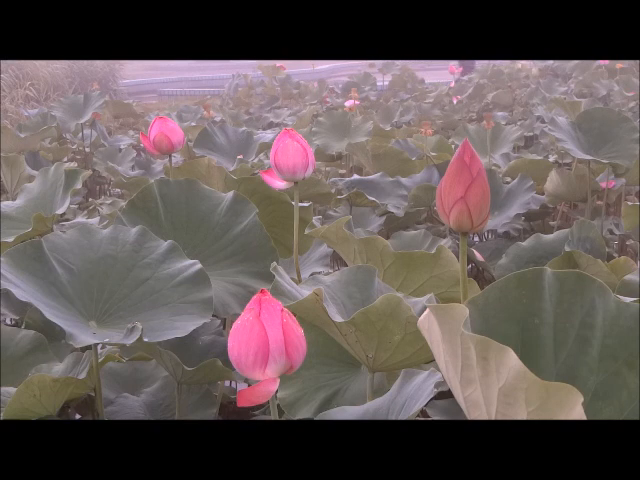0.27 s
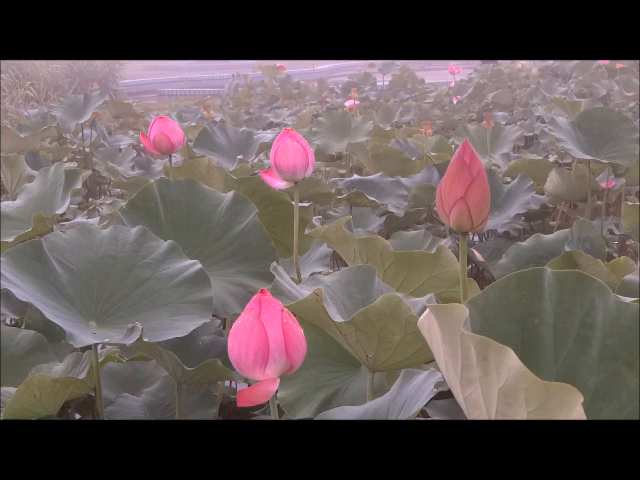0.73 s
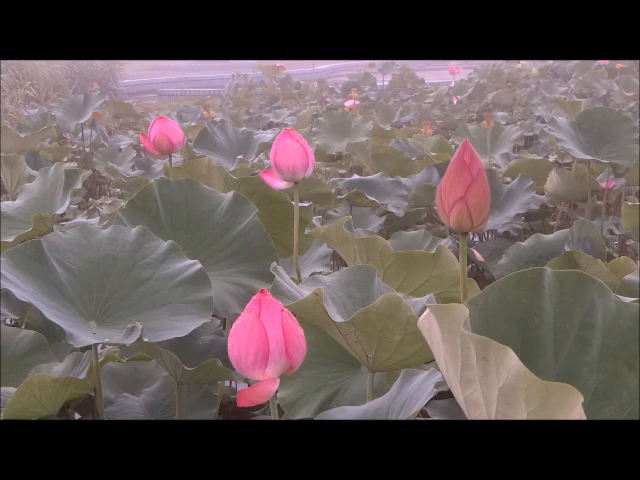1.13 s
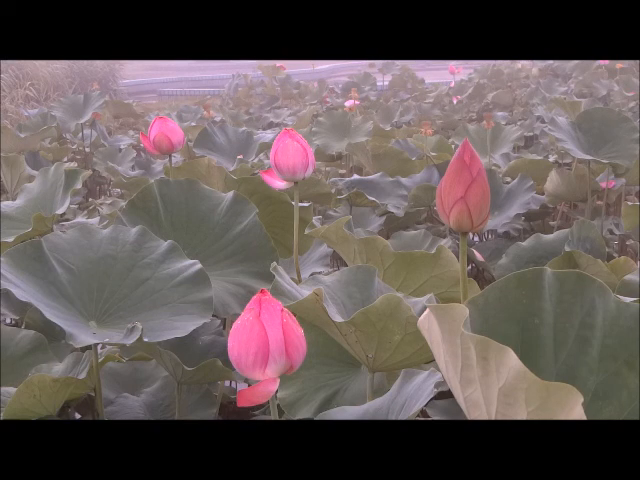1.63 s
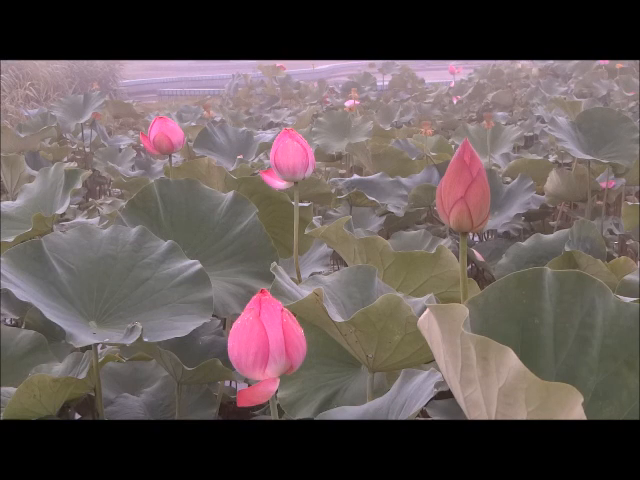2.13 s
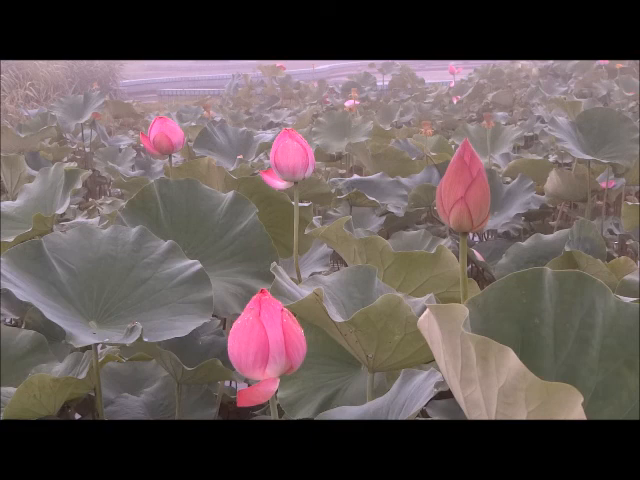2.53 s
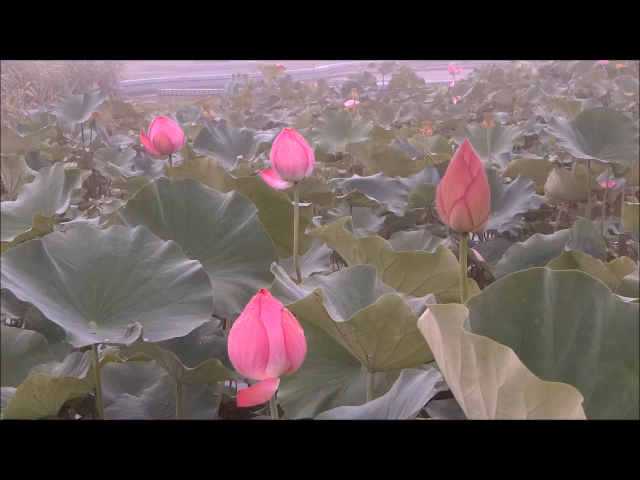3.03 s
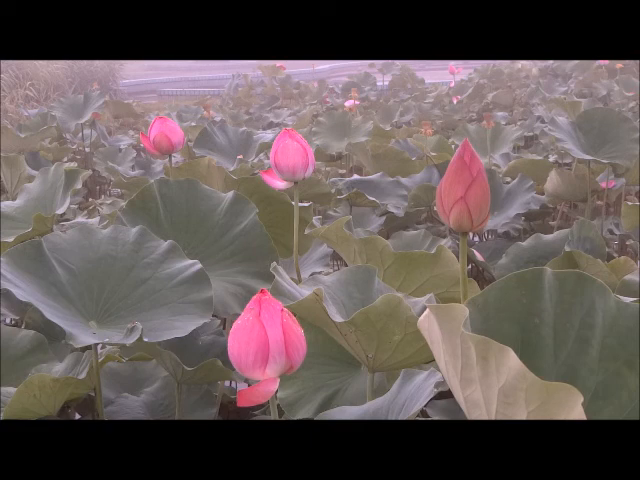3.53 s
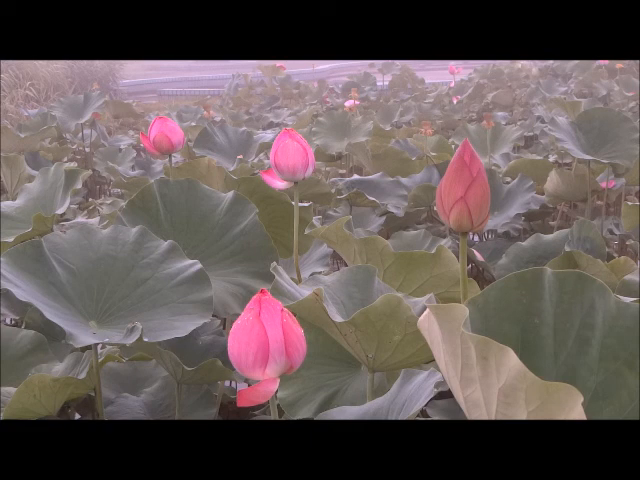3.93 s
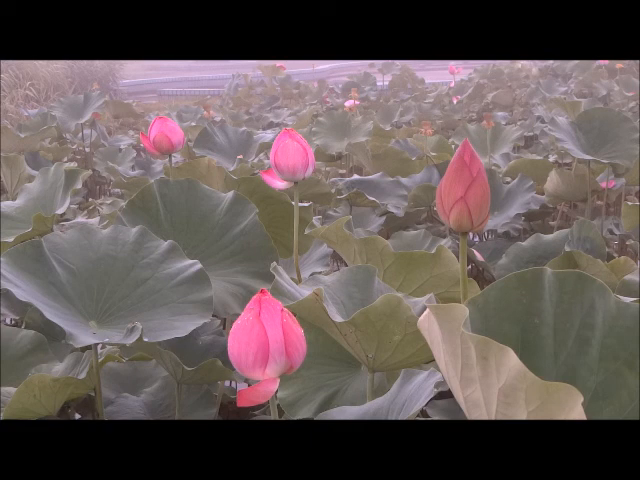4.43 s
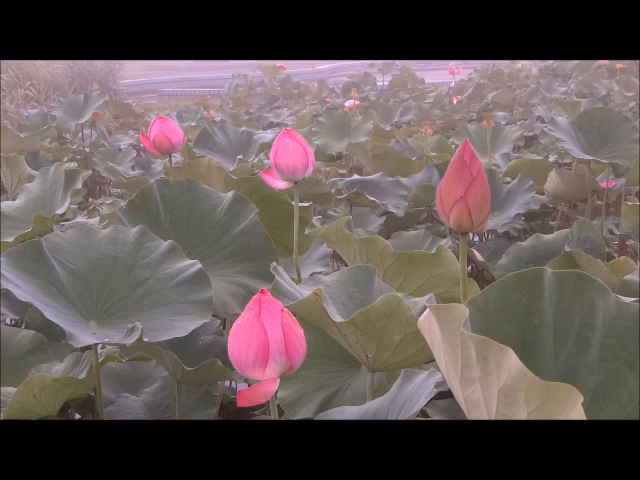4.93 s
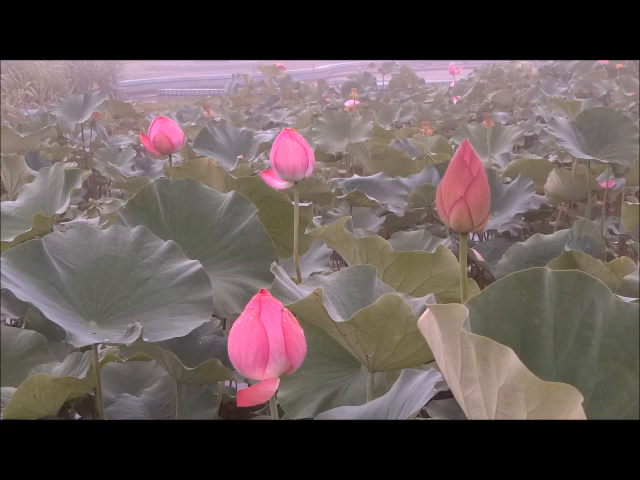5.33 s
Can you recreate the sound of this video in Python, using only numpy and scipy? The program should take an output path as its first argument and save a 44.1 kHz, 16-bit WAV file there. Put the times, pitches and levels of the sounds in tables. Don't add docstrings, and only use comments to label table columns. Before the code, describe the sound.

A dense, steady, very high cicada drone fills a summer lotus pond, with faint low traffic rumble far behind. A reed bird slightly left starts with a rapid rasping run, then gives churrs, faint pairs, rattles, zigzag syllables and, at the end, two buzzes. Tiny far whistles and a few dry ticks near the camera punctuate it. Open air, light echo, stereo camera microphone.

```python
import sys
import numpy as np
from scipy import signal
from scipy.io import wavfile
from scipy.ndimage import uniform_filter1d

SR = 44100
rng = np.random.default_rng(int(sys.argv[2]) if len(sys.argv) > 2 else 0)


def wav_out(sig):
    wavfile.write(sys.argv[1], SR, np.round(np.clip(np.atleast_2d(sig).T, -1, 1) * 32767).astype(np.int16))


def volts_from_decibels(level):
    exponent = np.asarray(level, float) / 20
    return 10 ** exponent


N = 246078


def evened(x):
    return x / np.sqrt(np.mean(x ** 2) + 1e-20)


def read(points, hz):
    f, value = np.transpose(points)
    return np.interp(np.log(hz + 1), np.log(f + 1), value)


def curve(points):
    return np.interp(np.arange(N) / SR, *np.transpose(points))


def add(mix, s, sound):
    part = mix[round(s * SR):][:len(sound)]
    part += sound[:len(part)]


def ring(x, hz, width_hz):
    pole = np.exp((2j * np.pi * hz - np.pi * width_hz) / SR)
    for _ in range(2):
        x = signal.lfilter([1 - abs(pole)], [1, -pole], x)
    return 2 * x.real


# f/Hz, likeness/0-1
LIKENESS = [(96, 1), (230, 0.83), (390, .1), (1400, .09), (2530, 0.31), (4030, 0.53), (6440, .82),
            (10300, 0.69)]
# f/Hz, left minus right/dB
BALANCE = [(100, 0), (290, 1), (450, -0.3), (1000, -.3), (3140, 2), (4660, 0), (6920, -4), (10300, -2)]
# f/Hz, left lead/rad
LEFT_LEAD = [(0, .5), (2500, -0.29), (3960, -0.75), (4480, -.2), (7580, -.2), (9130, -.78), (10200, -.5)]


def wide(colour, patchy_db, flicker_db, size=1024):
    frames, hz = 4 * N // size + 5, np.fft.rfftfreq(size, 1 / SR)
    a, b, c, d, patches = rng.standard_normal((frames, len(hz), 5)).T
    patches = evened(uniform_filter1d(uniform_filter1d(patches, 10, 0), 10, 1))
    flicker = evened(uniform_filter1d(rng.standard_normal(frames), 3))
    same = np.clip(read(LIKENESS, hz), -1, 1)[:, None]
    right, other = a + 1j * b, c + 1j * d
    left = same * right + np.sqrt(1 - same ** 2) * other
    left = left * np.exp(1j * read(LEFT_LEAD, hz))[:, None]
    tilt = volts_from_decibels(read(BALANCE, hz) / 2)[:, None]
    level_db = read(colour, hz)[:, None] + patchy_db * patches + flicker_db * flicker
    z = np.array([left * tilt, right / tilt]) * volts_from_decibels(level_db)
    out = signal.istft(z, nperseg=size, noverlap=3 * size // 4)[1][:, :N]
    return out / np.sqrt(np.mean(out.mean(0) ** 2))


# f/Hz, density/dB per Hz
LOW_CHOIR_COLOUR = [(3180, -40), (5400, -12), (5600, -15), (6060, -1), (6390, -0.5), (6790, -1),
                    (7230, -14.5), (7350, -23.5), (9560, -17), (16200, -120)]
HIGH_CHOIR_COLOUR = [(5000, -54), (7200, -28.5), (7700, -11.5), (8300, -3), (8850, 3.5), (9200, 2.5),
                     (9380, -2), (9500, 0), (9750, -11.5), (10100, -14.5), (10400, -27), (10800, -50.5),
                     (11300, -57.5), (14000, -100)]
# t/s, level/dB
CHOIR_SWELL = [(0, .5), (.8, -.5), (1.3, .5), (3, 0), (5.1, 0.03), (5.58, -0.8)]


def cicada_choirs():
    swell_db = curve(CHOIR_SWELL)
    low = volts_from_decibels(-56 + swell_db) * wide(LOW_CHOIR_COLOUR, patchy_db=0.97, flicker_db=-0.7)
    high = volts_from_decibels(-43.8 + swell_db) * wide(HIGH_CHOIR_COLOUR, patchy_db=0.54, flicker_db=.5)
    return low + high


def near_cicada():
    t = np.arange(N) / SR
    beat_hz, body_hz, width_hz = 121 + .4 * np.sin(2 * np.pi * .3 * t), 9500, 520
    beats = np.cumsum(beat_hz) / SR
    scrape = np.exp(-(beats % 1) / .08) * rng.standard_normal(N)
    body = ring(ring(scrape, body_hz, width_hz), body_hz, width_hz)
    return volts_from_decibels(-54) * evened(body) * volts_from_decibels([[.5], [-.5]])


# f/Hz, density/dB per Hz
CHATTER_COLOUR = [(900, -36), (1700, -8.5), (2400, 0), (3600, -0.5), (4600, -8.5), (6000, -43)]
# t/s, level/dB
CHATTER_SWELL = [(0, -63), (.8, -67.5), (1.3, -71), (1.85, -65), (2.5, -69.5), (3.1, -67.5), (3.8, -70.5),
                 (4.5, -86), (5.1, -79), (5.58, -61.5)]


def far_chatter():
    return volts_from_decibels(curve(CHATTER_SWELL)) * wide(CHATTER_COLOUR, patchy_db=4.5, flicker_db=-1.0, size=512)


# f/Hz, density/dB per Hz
RUMBLE_COLOUR = [(12, -15), (25, -18), (38, -8.5), (52, 1.5), (68, 1), (85, -4.5), (108, -0.5), (122, -.5),
                 (140, -5), (370, -17.5), (650, -17.5), (1200, -21), (4400, -29), (5700, -26.5),
                 (7400, -47), (12000, -110)]


def traffic_rumble():
    return volts_from_decibels(-54.5) * wide(RUMBLE_COLOUR, patchy_db=.5, flicker_db=1.2, size=4096)


# length/s, attack/s, release/s, change over the hold/dB
STROKE_BREATH = dict(chack=(.022, .005, .009, 0), chik=(.017, .005, 0.008, 1),
                 tsek=(0.023, .004, 0.0074, 1.7), scold=(.046, -0.2, .012, -3), tzik=(.038, .007, .014, 1),
                 rasp=(.058, .004, .008, 11.6), mutter=(0.063, .003, .014, 1), churr=(.115, .052, .022, -6),
                 scrape=(.022, .006, .006, 1), buzz=(.062, .006, .008, 2), burr=(.064, .006, .008, -1),
                 trill=(.045, .01, .007, 5), zee=(0.061, .006, 0.013, 8.2), zig=(.031, .007, .008, -5),
                 zag=(0.0538, 0.029, 0.012, 1), rat=(.026, .01, 0.0034, 0), tat=(.018, .004, .004, 3.7),
                 roll=(0.037, .003, 0.0055, 1))
# start f/Hz, turn f/Hz, end f/Hz, turn/share of length
STROKE_GLIDE = dict(chack=(3850, 3250, 2800, .5), chik=(3500, 3200, 3050, .6), tsek=(3750, 3560, 3100, .7),
                scold=(3450, 3500, 2780, 0.253), tzik=(3400, 3400, 3050, .7), rasp=(3150, 3080, 2600, .8),
                mutter=(2860, 2840, 2980, 0.39), churr=(2780, 2690, 2300, .5),
                scrape=(3000, 3250, 3150, .5), buzz=(2870, 2880, 3130, .6), burr=(2930, 2910, 2880, .5),
                trill=(3530, 3530, 3650, .5), zee=(3720, 3930, 3100, 0.74), zig=(3700, 2360, 2380, .75),
                zag=(2500, 3280, 2450, .58), rat=(2640, 2520, 2690, .5), tat=(2350, 2520, 2730, .5),
                roll=(2800, 2805, 2760, .5))
# flutter f/Hz, start and end swing/share of pitch above slack, unsteadiness/0-1
STROKE_FLUTTER = dict(chack=(440, .42, .28, .33), chik=(417, 0.395, .26, .2), tsek=(370, .5, .08, 0.27),
                  scold=(350, .36, .4, .33), tzik=(438, .38, .36, .14), rasp=(300, .46, .42, .24),
                  mutter=(280, .4, 0.396, .4), churr=(250, .36, 0.447, .16), scrape=(290, .4, .4, .45),
                  buzz=(284, .46, .44, .06), burr=(282, .47, .44, .07), trill=(140, .21, 0.19, .075),
                  zee=(290, .19, 0.078, .017), zig=(335, .3, .5, .36), zag=(320, .4, .5, .27),
                  rat=(290, .46, .5, .12), tat=(280, .6, .5, .1), roll=(146, 0.416, .42, .14))


def stroke(name, db, pitch):
    length, attack, release, hold_db = STROKE_BREATH[name]
    flutter_hz, swing_start, swing_end, unsteady = STROKE_FLUTTER[name]
    *glide_hz, turn = STROKE_GLIDE[name]
    slack_hz, edge_db = 1602, -14.5
    t = np.arange(0, length, 1 / SR)
    hz = pitch * uniform_filter1d(np.interp(t / length, [0, turn, 1], glide_hz), len(t) // 5)
    swing_hz = np.maximum(np.linspace(swing_start, swing_end, len(t)) * (hz - slack_hz), 100)
    effort_s = [0, attack, max(length - release, attack), length]
    effort_db = np.interp(t, effort_s, [edge_db / 2, 0, hold_db, hold_db + edge_db])

    chance = np.repeat(rng.standard_normal((35, 400)), 16, axis=1)[:, :len(t) + 700]
    shake = evened(uniform_filter1d(chance[0], 120)[:len(t)])
    wander = evened(uniform_filter1d(uniform_filter1d(chance[1:], 350), 350))[:, :len(t)]
    beat = np.cumsum(flutter_hz * (1 + unsteady * shake)) / SR + rng.random()
    core = np.cumsum(hz - 0.2995 * swing_hz) / SR

    k = np.arange(-5, 12)[:, None]
    reach = abs(k) * flutter_hz / (swing_hz * np.where(k > 0, 1.75, .95))
    sides = np.exp(-reach ** 2.32) * np.where(k == 0, 1.3, 1)
    sides = sides * volts_from_decibels((2.5 + 3.7 * unsteady) * wander[:17])
    turns = core + k * beat + 0.34 * reach ** 2 + (0.048 + 0.36 * unsteady) * wander[17:]
    tone = (sides * np.sin(2 * np.pi * turns)).sum(0) / np.sqrt((sides ** 2).sum(0) / 2)
    return volts_from_decibels(db + effort_db) * tone * signal.windows.tukey(len(t), .2)


# (name, t after start/s, level/dB)
SYLLABLE_STROKES = dict(chik_chack=(.1193, [("chik", -.002, -6.5), ("chack", .039, -2.5)]),
                    tsek=(.074, [("chik", -.014, -9), ("tsek", 0, 1.6)]),
                    rattle=(.149, [("rat", -.004, -3.5), ("tat", .026, -3.5), ("roll", .045, -11.5)]),
                    zigzag=(.14, [("zig", .002, -4), ("zag", .03, -3)]),
                    buzz_burr=(.349, [("scrape", 0, -4), ("buzz", .014, -2), ("scrape", .117, -3),
                    ("burr", .131, 0)]))
# name, first t/s, last t/s, level/dB, pitch/factor
SONG_PHRASES = [
    ("chik_chack", .105, .582, -40, 1),
    ("tsek", 1.309, 1.383, -48.5, 0.99),
    ("tsek", 1.573, 1.647, -48.5, 0.99),
    ("rattle", 1.994, 2.292, -45, 1),
    ("zigzag", 2.92, 3.48, -45.5, 1),
    ("buzz_burr", 5.053, 5.053, -48, .895),
    ("buzz_burr", 5.404, 5.404, -47, 1.01),
]
# name, t/s, level/dB, pitch/factor
SINGLE_STROKES = [("scrape", 0, -49, .9), ("chack", .023, -43, 1.02), ("mutter", .515, -57, 0.98),
                  ("chik", .61, -53, .84), ("churr", .63, -44.5, 1), ("mutter", .96, -54.5, 1),
                  ("chik", 1.028, -46, .87), ("churr", 1.047, -42.5, 1), ("trill", 2.9, -57, 1),
                  ("zee", 2.584, -53, 1), ("chik", 3.626, -57, 1.05), ("scold", 3.646, -45.5, 1),
                  ("chik", 3.727, -55, 1.06), ("chack", 3.749, -46, 1.05), ("tzik", 4.157, -51.5, 0.99),
                  ("rasp", 4.685, -63.5, 1)]


def reed_bird():
    out = np.zeros(N)
    for name, first, last, db, pitch in SONG_PHRASES:
        every, strokes = SYLLABLE_STROKES[name]
        for s in np.linspace(first, last, round((last - first) / every) + 1):
            for part, after, part_db in strokes:
                add(out, s + after, stroke(part, db + part_db, pitch))
    for name, s, db, pitch in SINGLE_STROKES:
        add(out, s, stroke(name, db, pitch))
    return out


# t/s, length/s, start f/Hz, end f/Hz, level/dB
FAR_WHISTLES = [(.042, .025, 1820, 1850, -57.5), (.178, .025, 5680, 5480, -58),
                (.302, .03, 5700, 5200, -59), (0.525, .025, 3300, 3310, -54), (.767, .013, 4950, 5480, -58),
                (.779, .013, 5480, 4950, -58), (.806, .036, 5720, 4990, -53.5),
                (1.015, .02, 4000, 3600, -63), (1.046, .026, 3850, 4480, -60),
                (1.256, .023, 5660, 4830, -53), (2.095, 0.047, 2330, 2360, -64),
                (2.21, .062, 1840, 1860, -63.5), (2.517, .04, 1980, 2370, -63),
                (2.69, .04, 3740, 3780, -67), (2.698, .025, 1360, 1500, -66),
                (5.289, .012, 2600, 5400, -55.5), (5.365, .03, 2830, 2300, -66),
                (5.307, .017, 5250, 5070, -55)]


def far_birds():
    out = np.zeros(N)
    for s, length, start_hz, end_hz, db in FAR_WHISTLES:
        hz = np.linspace(start_hz, end_hz, round(length * SR))
        tone = np.sin(2 * np.pi * np.cumsum(hz) / SR)
        add(out, s, volts_from_decibels(db + 1) * tone * signal.windows.tukey(len(hz), .6))
    return out


# t/s, hollow knock peak level/dB, snap peak level/dB, snap f/Hz
TICK_EVENTS = [
    (.2115, -37, -32, 2400),
    (.216, -44.5, -40.5, 1900),
    (1.7236, -46, -22.5, 4400),
    (1.727, -44, -34, 4500),
    (3.4435, -36.5, -31, 3180),
    (3.465, -53, -53.5, 1500),
    (3.512, -49.5, -55, 1300),
    (4.08, -53, -43, 1800),
    (4.502, -51, -49, 1150),
    (4.835, -52, -47, 1800),
]
# f/Hz, width/Hz
BODY_RINGS = [(730, 440), (1500, 450), (2600, 1070), (4000, 940), (7000, 5700)]


def ticks():
    out, t = np.zeros(N), np.arange(1500) / SR
    for s, knock_db, snap_db, snap_hz in TICK_EVENTS:
        decay = .4 * np.exp(-t / 0.0003) + 0.11 * np.exp(-t / 0.0067)
        snap = rng.standard_normal(len(t)) * decay * (1 - np.exp(-t / 0.00013))
        snap[0] = 2.2
        for k, (hz, width_hz) in enumerate(BODY_RINGS):
            body = ring(snap, hz, width_hz)
            db = snap_db - 16 * abs(np.log2(hz / snap_hz)) if k else knock_db
            add(out, s, volts_from_decibels(db) * body / abs(body).max())
    return out


def banks(x, t60_s):
    t = np.arange(SR // 3) / SR
    shape = (2, len(t))
    sparse = rng.random(shape) < 2000 / SR
    taps = np.sign(rng.standard_normal(shape)) * sparse * (t > .004)
    tail = taps * volts_from_decibels(-60 * t / t60_s)
    return signal.fftconvolve(x[None], tail / np.linalg.norm(tail[0]), axes=1)[:, :N]


def scene():
    drone = cicada_choirs() + near_cicada() + far_chatter() + traffic_rumble()
    bird, far, tick = reed_bird(), far_birds(), ticks()
    late = np.array([bird, np.roll(bird, 1)])
    near = late * volts_from_decibels([[2.2], [-2.6]]) + far * volts_from_decibels([[.5], [-.5]]) + tick * volts_from_decibels([[.3], [-.3]])
    echo = volts_from_decibels(-8.5) * banks(bird + far + .5 * tick, t60_s=0.27)
    return near + echo + drone


def band_limit(x):
    return signal.sosfilt(signal.butter(12, 10900, fs=SR, output="sos"), x)


def record(dry):
    return band_limit(dry)


dry = scene()
out = record(dry)
wav_out(out)
```